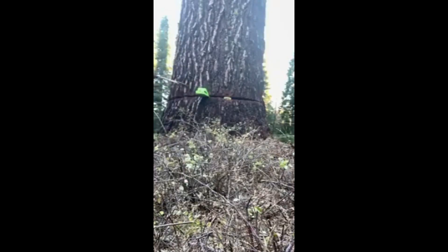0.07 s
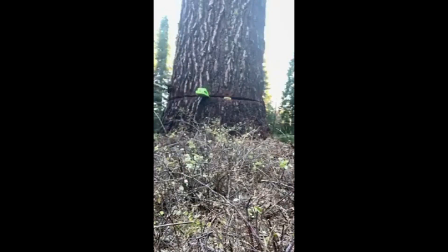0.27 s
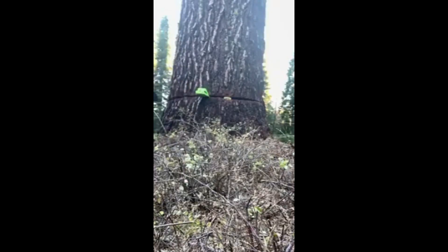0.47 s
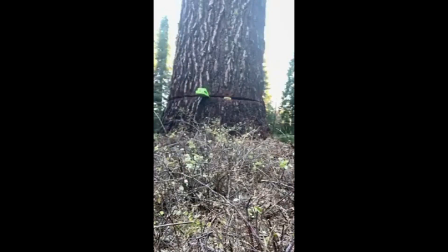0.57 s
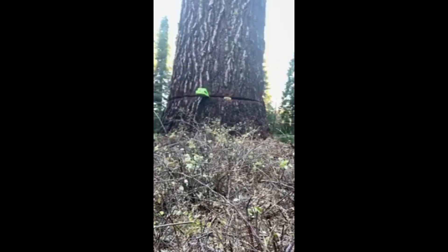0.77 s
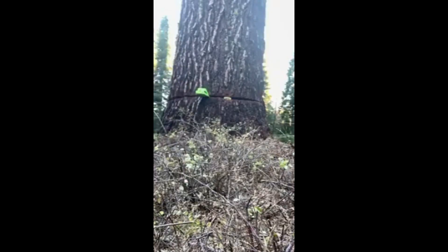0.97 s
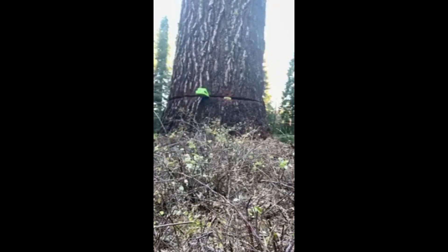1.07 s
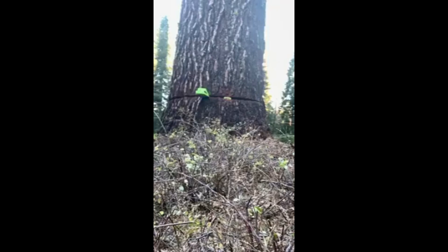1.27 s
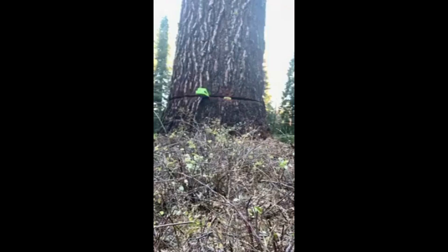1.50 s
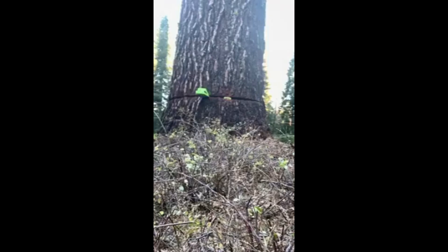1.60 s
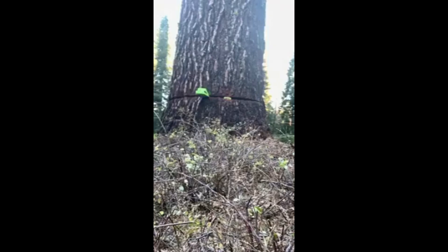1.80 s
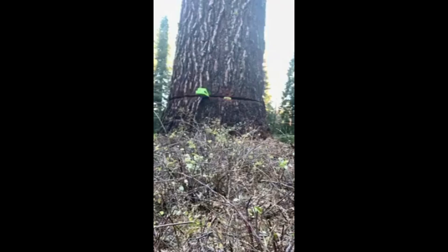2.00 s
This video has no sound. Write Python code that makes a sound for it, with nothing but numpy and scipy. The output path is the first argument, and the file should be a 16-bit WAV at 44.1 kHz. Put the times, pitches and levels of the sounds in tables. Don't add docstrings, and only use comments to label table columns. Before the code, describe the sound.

A sledge hits a felling wedge once, close and loud, with rattling metallic ring and deep trunk thud. Trees scatter a bright echo that lingers; later come cloth brushing and dull microphone knocks outdoors.

```python
import sys
import numpy as np
from scipy import signal
from scipy.fft import rfft, irfft, next_fast_len
from scipy.io import wavfile
from scipy.ndimage import uniform_filter1d, map_coordinates

SR = 44100
rng = np.random.default_rng(int(sys.argv[2]) if len(sys.argv) > 2 else 0)


def boost(x):
    u = np.asarray(x, float) / 20
    return 10 ** u


def bounce(signal):
    frames = np.transpose(np.atleast_2d(signal))
    limited = np.clip(frames, -1, 1)
    pcm = np.round(limited * 32767).astype(np.int16)
    wavfile.write(sys.argv[1], SR, pcm)


N = 90404

# time in seconds, brushing level in dB, pressure level in dB.
CLOTH_MOVES = [(1.3, -75, -82), (1.34, -70.5, -91), (1.39, -55.5, -64), (1.44, -52, -46.5),
               (1.458, -68.5, -54), (1.482, -61.5, -53.5), (1.492, -43, -39), (1.518, -52, -42),
               (1.56, -53, -45), (1.63, -47.5, -45), (1.68, -51.5, -47), (1.72, -59.5, -55.5),
               (1.765, -63, -58), (1.785, -74, -66), (1.9, -79, -87), (1.93, -64, -77), (1.975, -66.5, -67),
               (1.99, -51.5, -63.5), (2.05, -55, -44)]


def unit(x):
    return x / np.sqrt(np.mean(x ** 2) + 1e-20)


def along(points, hz):
    f, v = np.transpose(points)
    return np.interp(np.log(hz + 1), np.log(f + 1), v)


def curves(rows):
    s, *cols = np.transpose(rows)
    return [np.interp(np.arange(N) / SR, s, c) for c in cols]


def wobble(rate_hz):
    knots = rng.standard_normal(int(N * rate_hz / SR) + 4)
    return map_coordinates(knots, [np.arange(N) * rate_hz / SR])


def filtered(x, response):
    m = next_fast_len(N + SR // 2)
    return irfft(rfft(x, m) * response(np.fft.rfftfreq(m, 1 / SR)), m)[..., :N]


def hiss(spectrum):
    return unit(filtered(rng.standard_normal(N), lambda hz: boost(along(spectrum, hz))))


def since(start_s):
    return np.clip(np.arange(N) / SR - start_s, 0, None)


def ring(start_s, db, hz, t60_s, rise_s):
    t = since(start_s)
    return boost(db - 60 * t / t60_s) * (1 - np.exp(-t / rise_s)) * np.sin(2 * np.pi * hz * t)


def bell(x, centre, width):
    return np.exp(-.5 * ((x - centre) / width) ** 2)


def streaky(x, depth_db):
    z = signal.stft(x, nperseg=1024)[2]
    field = uniform_filter1d(rng.standard_normal(z.shape), 3, 0)
    field = unit(uniform_filter1d(field, 5, 1))
    gain = boost(depth_db * np.minimum(field, .6))
    return unit(signal.istft(z * gain, nperseg=1024)[1][:N])


def lead_in():
    # frequency in Hz, density in dB per Hz.
    bright_colour = [(2060, -87), (3500, -53), (4180, -23.5), (4740, -0.5), (7900, -28), (8790, -20),
                     (15800, -43.5)]
    low_colour = [(200, -19.5), (700, 0), (2000, -5), (3000, -14), (3600, -35)]
    start_s, length_s, level_db = .199, 0.025, -41
    t = since(start_s)
    level = boost(level_db + 3 * wobble(200))
    fade_in = np.clip(t / 0.0021, 0, 1)
    fade_out = np.clip((length_s + 0.0064 - t) / 0.012, 0, 1)
    return level * fade_in * fade_out * (hiss(bright_colour) + boost(-14.5) * hiss(low_colour))


def chatter():
    # time in seconds, force level in dB.
    force = [
        (.222, -74),
        (.232, -31.5),
        (.24, -18),
        (.253, -14.5),
        (.261, -19),
        (.285, -26.5),
        (.3, -25),
        (.315, -40),
        (.34, -55.5),
    ]
    # frequency in Hz, density in dB per Hz.
    chatter_colour = [(59, -46), (110, -14), (250, -16.5), (556, -7.5), (1350, -16), (2030, -6),
                      (4440, -17.5), (9920, -25), (15800, -37)]
    force_db, = curves(force)
    touching = (since(force[-1][0]) == 0) * (since(force[0][0]) > 0)
    return boost(force_db + 2.59 * wobble(300)) * touching * hiss(chatter_colour)


def contacts():
    # start in seconds, level in dB, frequency in Hz, t60 in seconds.
    contact_modes = [(0.2255, -39, 3020, .08), (0.2283, -29, 3026, 0.056), (0.2305, -17, 2990, 0.051),
                     (.2335, -21, 2890, .07), (.227, -34, 2094, 0.061), (.2345, -20, 2065, .1),
                     (.2425, -15, 2058, 0.054), (.241, -17.5, 2390, 0.047), (.247, -14, 2550, 0.034),
                     (.2465, -23.5, 4660, 0.046), (.263, -16.5, 2074, 0.025), (.264, -20, 3610, 0.027),
                     (.276, -18, 2790, .03), (.2885, -19.5, 2940, 0.021), (.301, -17.5, 1930, 0.022),
                     (.308, -26, 1750, 0.028), (.316, -28, 1950, .02), (0.239, -6, 3127, 0.044),
                     (0.2427, -3.5, 3098, 0.026), (0.244, -9, 2820, 0.037), (0.247, -6.5, 2980, 0.019),
                     (.2495, -11.5, 2038, 0.054), (0.2514, -7.5, 1930, .02), (.262, -14, 2970, .015),
                     (.269, -9.5, 1900, 0.02), (0.269, -13, 3430, 0.02), (.281, -11.5, 2000, 0.013),
                     (.281, -13, 3580, 0.023), (0.2848, -8.5, 1900, 0.02), (.293, -8.5, 1890, 0.018),
                     (.296, -15.5, 3610, 0.018), (.231, -23, 2056, .15), (.240, -14, 3760, 0.033),
                     (.250, -9.5, 3440, 0.014), (0.248, -15.5, 1080, 0.033), (0.2506, -6.5, 1800, .022),
                     (.270, -23.5, 4000, 0.014), (0.287, -14, 2400, 0.024), (0.326, -35, 1840, 0.043),
                     (.334, -24, 1900, 0.026), (.252, -26.5, 610, 0.031), (.268, -17.5, 540, 0.088),
                     (.277, -17.5, 643, 0.088), (.296, -18.5, 685, 0.065)]
    rise_s = 0.0019
    rings = sum(ring(s, db + 5, hz, t60_s, rise_s) for s, db, hz, t60_s in contact_modes)
    return rings * boost(1.3 * wobble(900))


def trunk():
    # start in seconds, level in dB, frequency in Hz, t60 in seconds.
    trunk_modes = [
        (.259, -13, 54, .19),
        (.262, -29, 150, .14),
        (.348, -26, 61, .33),
        (.44, -41, 85, .4),
        (.53, -44, 60, .3),
        (.35, -46, 608, .8),
    ]
    rise_s = .012
    return sum(ring(*mode, rise_s) for mode in trunk_modes) * boost(.8 * wobble(30))


def blow():
    return lead_in() + chatter() + contacts() + trunk()


def forest():
    # frequency in Hz, t60 in seconds.
    near_t60 = [(100, 0.9), (600, 0.76), (1400, 0.84), (1800, 0.81), (2300, 0.74), (6000, 0.49),
                (12000, .35)]
    # frequency in Hz, density in dB per Hz.
    echo_colour = [(100, -29.5), (300, -21), (700, -12.5), (1800, -14), (4100, -12), (4400, -32.5),
                   (5800, -18.5), (16000, -34.5)]
    # frequency in Hz, width in Hz, level in dB.
    wedge_modes = [(1610, 40, -1), (1755, 64, 6.5), (1900, 43, 6.5), (2220, 25, 0.5), (2610, 44, 3),
                   (3216, 30, 0.5), (3580, 42, 1.5), (3973, 50, 0.5)]
    start_s, level_db, far_db, far_longer = 0.28, -31.5, -9, 2.17

    def ringing(f):
        modes = sum(boost(db) * 1j * f * w / (c * c - f * f + 1j * f * w) for c, w, db in wedge_modes)
        return 0.59 + abs(modes)

    noise = streaky(filtered(hiss(echo_colour), ringing), depth_db=5.0)
    hz, s, z = signal.stft(noise, SR, nperseg=256)
    fall_db = -60 * np.clip(s - start_s, 0, None) / along(near_t60, hz)[:, None]
    decay = boost(fall_db) + boost(far_db + fall_db / far_longer)
    tail = signal.istft(z * decay, SR, nperseg=256)[1][:N]
    fade_in = np.clip(since(start_s - .04) / .04, 0, 1)
    return boost(level_db + 0.74 * wobble(40)) * fade_in * tail


def linger():
    # frequency in Hz, width in Hz, level in dB, t60 in seconds.
    slope_lines = [(1680, 30, -45, 1.27), (1815, 55, -41.5, 1.6), (1930, 24.9, -48, 0.82),
                   (2220, 13, -54.5, 0.67), (2860, 20, -50.5, .8), (3040, 20, -51.5, .6),
                   (3348, 20, -48, 1.4), (3700, 13, -52, 0.89), (3600, 15, -52.5, 1), (3860, 15, -57, 0.7)]
    t = since(0.28)

    def line(hz, width_hz):
        return unit(filtered(rng.standard_normal(N), lambda f: bell(f, hz, width_hz)))

    lines = sum(boost(db - 60 * t / t60_s) * line(hz, width_hz) for hz, width_hz, db, t60_s in slope_lines)
    return np.clip(t / 0.063, 0, 1) * lines


def knocks():
    # start in seconds, level in dB, frequency in Hz, t60 in seconds.
    case_modes = [(1.35, -49, 1990, 0.0094), (1.360, -47, 1900, 0.0094), (1.4117, -30, 1044, 0.0088),
                  (1.4125, -41.5, 656, 0.019), (1.4128, -29.5, 354, 0.0086), (1.423, -42, 1248, .012),
                  (1.4849, -33, 1780, 0.012), (1.487, -20.5, 333, 0.013), (1.4892, -31.5, 1220, 0.01),
                  (1.4933, -24, 109, 0.037), (1.515, -33, 127, .06), (1.519, -45, 420, 0.013),
                  (1.53, -37, 54.5, 0.069), (1.551, -44, 450, .01), (1.551, -41, 1100, 0.013),
                  (1.577, -38.5, 377, 0.023), (1.582, -39.5, 900, .01), (1.597, -38, 108, 0.032),
                  (1.62, -43.5, 1210, 0.011), (1.631, -42, 337, 0.021), (1.655, -40, 447, 0.018),
                  (1.661, -36, 101, 0.049), (1.677, -41.5, 400, 0.019), (1.702, -47, 300, 0.029),
                  (1.7311, -37, 444, 0.016), (1.7305, -43, 1000, 0.0047), (1.797, -53, 601, 0.011),
                  (1.988, -49, 2104, 0.0088), (2.011, -41, 204, 0.02), (2.017, -43.5, 151.3, 0.033),
                  (2.0275, -39.5, 740, 0.012), (2.0285, -40, 349, .018), (2.034, -45.5, 608, .015),
                  (2.039, -35, 54.2, 0.073)]
    rise_cycles = 0.43
    return sum(ring(s, db + 7.5, hz, t60_s, rise_cycles / hz) for s, db, hz, t60_s in case_modes)


def snaps():
    colour = [(1500, -16), (4500, -10), (5890, 0), (7500, -9), (12000, -17), (15500, -24)]
    events = [(1.4845, -25.5, 0.039), (0.78, -53, .008)]
    bursts = sum(boost(db - 60 * since(s) / t60_s) * (since(s) > 0) for s, db, t60_s in events)
    return bursts * hiss(colour)


def cloth():
    # frequency in Hz, density in dB per Hz.
    cloth_colour = [(400, -10.5), (1000, -3), (2200, -2.5), (2800, -10.5), (3800, -4), (9000, -12.5),
                    (15000, -12), (15900, -31)]
    # frequency in Hz, width in Hz, level in dB.
    weave_bands = [(2620, 140, -9), (3130, 88, -4), (4502, 840, -2.5), (7510, 500, -2), (8520, 1200, 7),
                   (11660, 840, -3), (14270, 600, 0.5)]
    # time in seconds, level in dB, half length in seconds.
    shifts = [
        (0.657, -72.5, 0.067),
        (0.772, -67, 0.017),
        (0.815, -61.5, 0.01),
        (.865, -64.5, 0.026),
        (.96, -69, 0.031),
        (1.06, -65, 0.032),
        (1.154, -65.5, 0.031),
        (1.25, -65, 0.029),
        (1.319, -67.5, 0.014),
    ]
    s = np.arange(N) / SR
    brush = (s > CLOTH_MOVES[0][0]) * boost(curves(CLOTH_MOVES)[0])
    brush = brush + sum(boost(db) * bell(s, at_s, half_s) for at_s, db, half_s in shifts)
    grain = boost(3.5 + 0.765 * wobble(65) + 0.97 * wobble(500))

    def weave(hz):
        return boost(sum(db * bell(hz, c, w) for c, w, db in weave_bands))

    return brush * grain * streaky(filtered(hiss(cloth_colour), weave), depth_db=6.5)


def rumble():
    # frequency in Hz, density in dB per Hz.
    rumble_colour = [(25, -0.5), (60, 1.5), (110, 1.5), (300, -8), (500, -10.5), (1200, -16), (2500, -26),
                     (5000, -80)]
    pressing = np.arange(N) / SR > CLOTH_MOVES[0][0]
    press_db = curves(CLOTH_MOVES)[1] + 3.13 * wobble(25.06) + 2.76 * wobble(90)
    return pressing * boost(press_db) * hiss(rumble_colour)


def air():
    # frequency in Hz, density in dB per Hz.
    air_colour = [(25, -8.5), (160, -11), (250, -19.5), (600, -10.5), (1500, -19.5), (2500, -20),
                  (4500, -30), (14000, -40.5)]
    # time in seconds, level in dB over the calm.
    gusts = [
        (0, 1.5),
        (.6, 0.5),
        (1.1, 4.5),
        (1.6, -6),
        (1.85, -5.5),
        (2.05, 2),
    ]
    level_db = -63.5 + curves(gusts)[0] + 1.3 * wobble(3.1) + 0.99 * wobble(26)
    return boost(level_db) * streaky(hiss(air_colour), depth_db=0.5)


def starved(x):
    # start in seconds, end in seconds, frequency in Hz, half width in Hz.
    wide_slices = [(.44, .65, 2500, 60), (.7, .9, 2550, 60), (.86, 1.0, 3050, 90), (.6, .77, 4300, 130),
                   (1.45, 1.483, 3000, 350), (1.45, 1.483, 4050, 200)]
    low_hz, high_hz, hole_share = 2150, 4400, .36
    early_db, late_db, early_until_s, wide_db = -24, -7, 1.03, -14
    hz, s, z = signal.stft(x, SR, nperseg=2048, noverlap=1536)
    field = uniform_filter1d(rng.standard_normal(z.shape), 2, 0)
    field = uniform_filter1d(field, 13, 1)
    presence = ((hz > low_hz) & (hz < high_hz))[:, None]
    hole = (field < np.quantile(field, hole_share)) * presence
    wide = sum(np.outer(abs(hz - at_hz) < half_hz, (s > start_s) & (s < end_s))
               for start_s, end_s, at_hz, half_hz in wide_slices)
    gain = boost(np.where(s < early_until_s, early_db, late_db) * hole + wide_db * wide)
    return signal.istft(z * gain, SR, nperseg=2048, noverlap=1536)[1][:N]


def scene():
    quiet = forest() + linger() + cloth() + rumble() + air()
    return (blow() + knocks() + snaps() + starved(quiet))[None]


def low_pass(x):
    return signal.sosfilt(signal.butter(12, 15960, fs=SR, output="sos"), x)


def record(dry):
    top_hz = 15650
    held = dry / (1 + abs(dry / 1.05) ** 6) ** (1 / 6)

    def band_limit(hz):
        return np.sin(np.pi / 2 * np.clip((top_hz + 150 - hz) / 400, 0, 1)) ** 2

    return low_pass(filtered(held, band_limit))


dry = scene()
out = record(dry)
bounce(out)
```